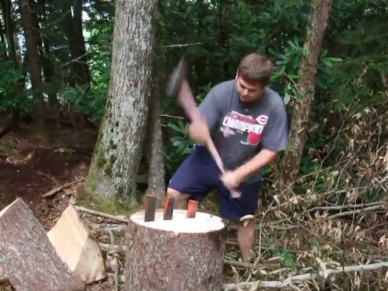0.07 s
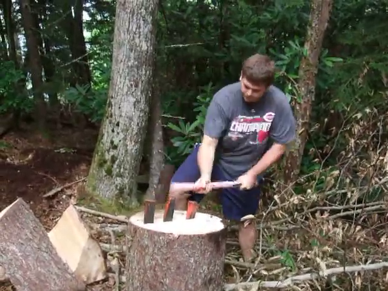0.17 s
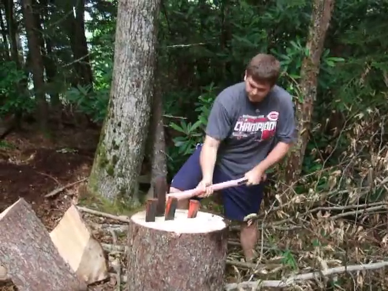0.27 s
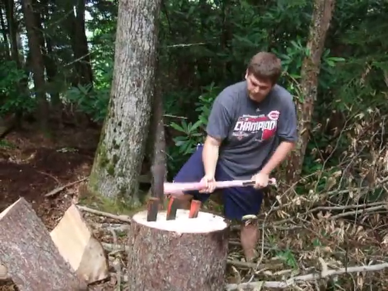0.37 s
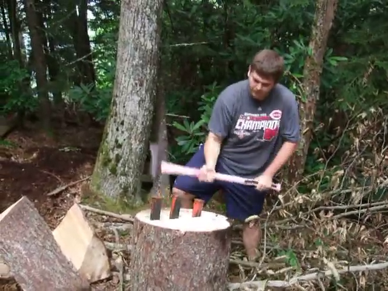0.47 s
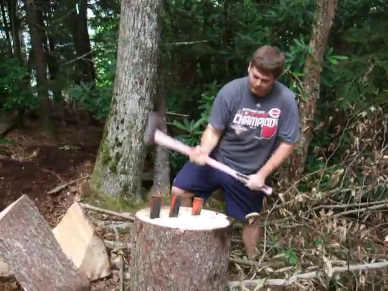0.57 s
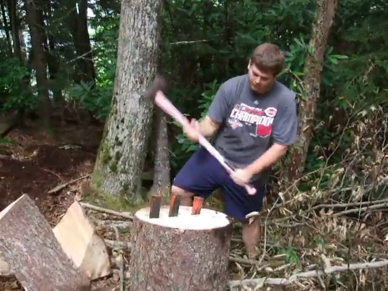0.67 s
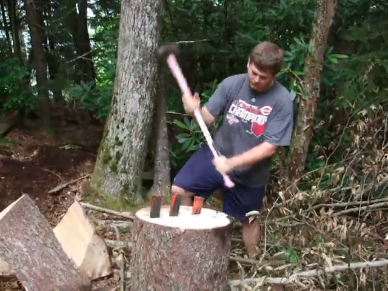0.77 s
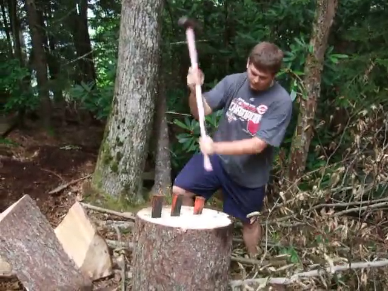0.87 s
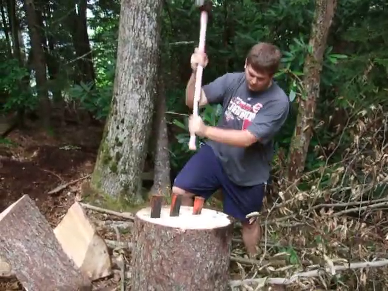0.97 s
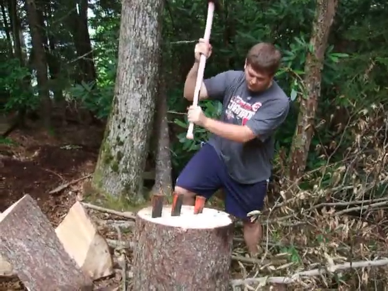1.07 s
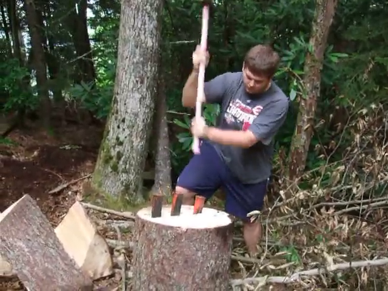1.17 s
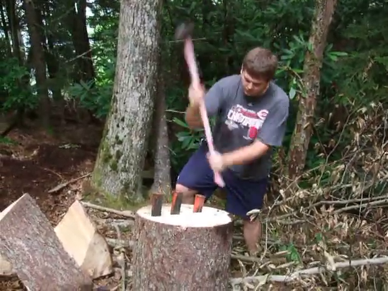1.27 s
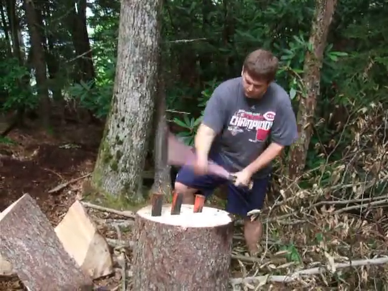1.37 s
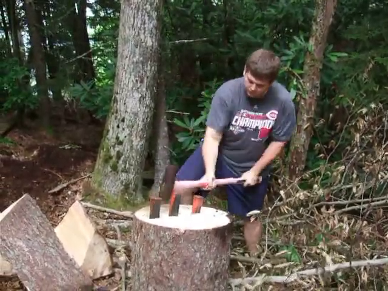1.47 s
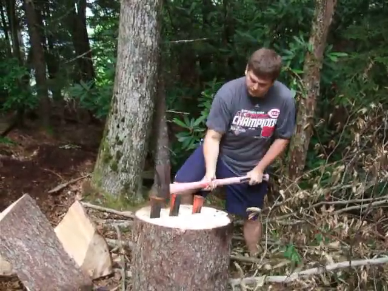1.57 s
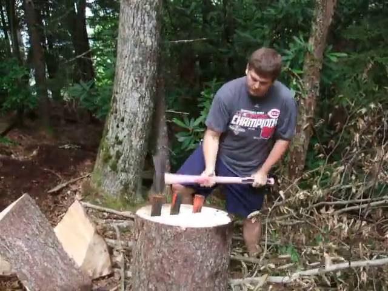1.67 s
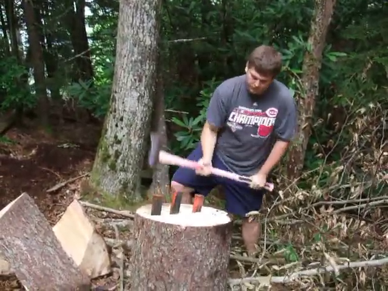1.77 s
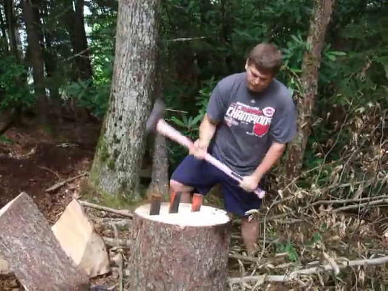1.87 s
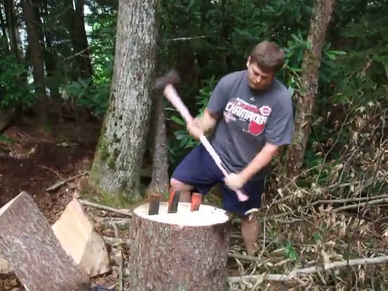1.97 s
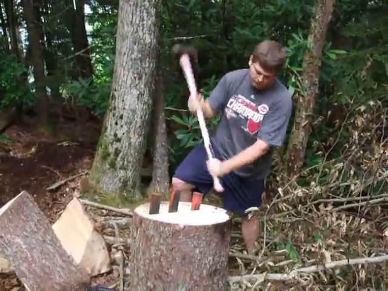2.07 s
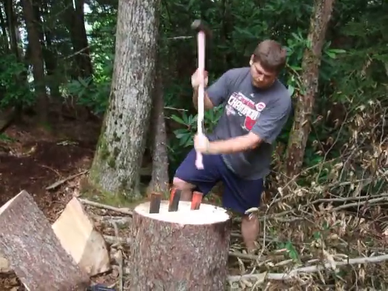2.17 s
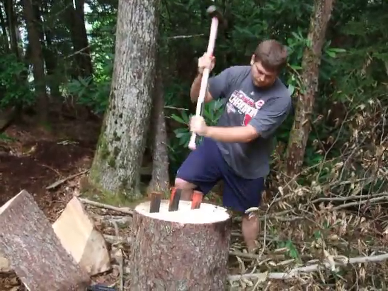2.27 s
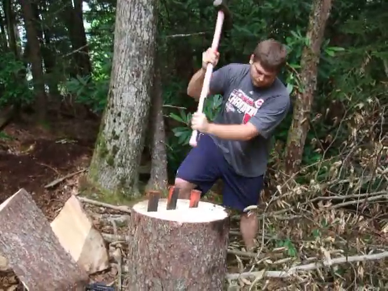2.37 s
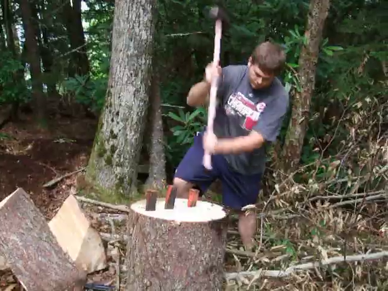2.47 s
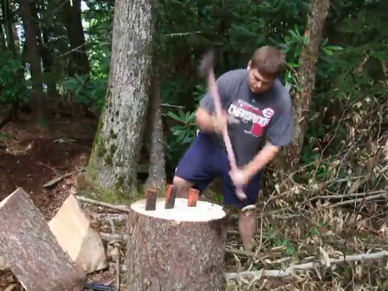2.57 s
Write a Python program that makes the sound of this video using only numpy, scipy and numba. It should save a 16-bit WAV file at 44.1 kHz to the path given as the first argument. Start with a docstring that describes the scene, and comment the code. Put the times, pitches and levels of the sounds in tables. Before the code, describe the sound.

Two hard metallic hammer strikes on splitting wedges outdoors, the first glancing off with a woody rattle

```python
"""Through a faint hiss comes the clink of a sledgehammer on a steel wedge in a log, at the edge of a wood.
The head glances off and clatters on the log; a second blow, on a lower-pitched wedge, bounces once.
Blows are sums of decaying modes with a noisy crack; knocks, thumps and twig ticks are resonant noise bursts.
The ground, the log and the trees scatter sound back as decaying random echoes. The recorder's limiter
ducks at each blow, so that the echo swells up as it lets go."""
import sys
import numpy as np
from scipy import signal
from scipy.fft import rfft, irfft
from scipy.io import wavfile
from numba import njit

SR = 44100
rng = np.random.default_rng(int(sys.argv[2]) if len(sys.argv) > 2 else 0)


def master_out(mix):
    """Clip the mix to full scale and print it as 16-bit PCM to the path in sys.argv[1]."""
    frames = np.transpose(np.atleast_2d(mix))
    ceiling = np.clip(frames, -1, 1)
    pcm = np.round(ceiling * 32767).astype(np.int16)
    wavfile.write(sys.argv[1], SR, pcm)


N = 114660  # length [samples]
TIME_S = np.arange(N) / SR


def undb(db):
    """Level: an amplitude ratio is ten to the power of its decibels over twenty."""
    return 10 ** (np.asarray(db) / 20)


def burst(x, db):
    """Energy scaling: set a short sound's level by its whole energy spread over 10 ms."""
    return x * undb(db) / np.sqrt(np.sum(x ** 2) / 441)


def fade(t60):
    """Exponential decay: the amplitude falls by 60 dB in t60 seconds."""
    return np.exp(-np.log(1000) * TIME_S / t60)


def at(s, x):
    """Pure delay: silence precedes a sound that starts at s seconds."""
    return np.concatenate([np.zeros(int(s * SR)), x])[:N]


def band(x, hz, q):
    """Resonance: a two-pole peak passes a band whose width is its frequency over q."""
    b, a = signal.iirpeak(hz, q, fs=SR)
    return signal.lfilter(b, a, x)


def low_cut(x, hz, order):
    """High-pass filtering: the response falls ever more steeply below the cutoff as the order rises."""
    return signal.sosfilt(signal.butter(order, hz, "high", fs=SR, output="sos"), x)


def narrow(x):
    """Band limiting: a linear-phase low-pass models the recorder's narrow sound channel."""
    lowpass = signal.firwin(241, 5910, window=("kaiser", 9), fs=SR)
    return signal.fftconvolve(x, lowpass, "same")


def crunch(t60):
    """Contact noise: a dying run of tiny pushes of random sign has a broad spectrum."""
    return np.sign(rng.standard_normal(N)) * fade(t60)


def ring(modes):
    """Modal superposition: a struck body sounds as damped sines that start together."""
    return sum(burst(np.sin(2 * np.pi * hz * TIME_S) * fade(t60), db) for hz, db, t60 in modes)


def air():
    """Shaped noise: a spectral envelope turns white noise into the faint, even hiss of the wood."""
    # spectral envelope of the hiss: (frequency [Hz], relative level [dB])
    envelope = [(15, -36.5), (25, -0.5), (170, -2.5), (267, -5.5), (392, -2.5), (550, -4.5), (616, -3),
                (1550, -6), (1700, -5.5), (4390, -3.5), (5500, -7.5), (7150, -58.5), (12100, -120)]
    hz, db = np.array(envelope).T
    bins_hz = np.maximum(np.fft.rfftfreq(N, 1 / SR), 1)
    gain = undb(np.interp(np.log(bins_hz), np.log(hz), db))
    hiss = narrow(irfft(rfft(rng.standard_normal(N)) * gain, N))
    return hiss / hiss.std() * undb(-50.5)


def scatter(x, db, t60, build_s, patchy_db):
    """Multiple scattering: convolution with uneven random echoes that build up and die away."""
    # one random strength for each run of 64 samples
    strength_db = patchy_db * np.repeat(rng.standard_normal(N // 64 + 1), 64)[:N]
    echoes = rng.standard_normal(N) * undb(strength_db)
    echoes *= fade(t60) * (1 - np.exp(-TIME_S / build_s))
    echoes *= undb(db) / np.sqrt(np.sum(echoes ** 2))
    return signal.fftconvolve(x, echoes)[:N]


def near_scatter(direct):
    """Early reflection: the log and the ground return short, patchy echoes."""
    return scatter(direct, db=-13, t60=0.075, build_s=0.00249, patchy_db=4.5)


def tree_scatter(sent):
    """Diffuse reverberation: trees return a slow-building tail, and those deeper in the wood a longer one."""
    build_s = 0.021
    edge = scatter(sent, db=-26, t60=0.62, build_s=build_s, patchy_db=3)
    deep = scatter(sent, db=-34.5, t60=1.04, build_s=build_s, patchy_db=1)
    return edge + deep


def twigs():
    """Resonant excitation: a brief snap of noise drives two broad resonances of a twig or chip."""
    # dry ticks: (time [s], level of the variable resonance [dB], its frequency [Hz])
    ticks = [(0.735, -45, 3460), (0.9016, -42, 3740), (0.9669, -46, 2700), (1.1965, -39.5, 3850),
             (1.8737, -51, 4530), (1.895, -44, 4100), (2.0916, -51.5, 4930), (2.1765, -49, 4600),
             (2.342, -50, 4900), (2.353, -57, 4530), (2.555, -42.5, 4440)]
    q = 0.95
    body_hz, body_db = 1020, -12.5  # body level is relative to the tick's own
    out = np.zeros(N)
    for s, db, hz in ticks:
        snap = narrow(crunch(t60=0.019))
        bright = burst(band(snap, hz, q), db)
        body = burst(band(snap, body_hz, q), db + body_db)
        out += at(s, bright + body)
    return out


def thumps():
    """Damped impact: two equal resonances in cascade leave a soft, low thump of the forest floor."""
    # dull thumps on the ground: (time [s], level [dB], frequency [Hz], noise t60 [s])
    impacts = [(.334, -34, 202, 0.026), (0.837, -54, 480, 0.11)]
    out = np.zeros(N)
    for s, db, hz, t60 in impacts:
        thump = band(band(crunch(t60), hz, 2.5), hz, 2.5)
        out += at(s, burst(thump, db))
    return out


def clatter():
    """Damped impact: each hammer-head knock excites a woody body, a bright snap and a hollow ring."""
    # hammer head on the log, levels ahead of the low cut: (time [s], body level [dB], body frequency [Hz],
    # snap level [dB], snap frequency [Hz], hollow ring level [dB], t60 of body and snap noise [s])
    knocks = [(0.4621, -28.5, 1510, -23, 4270, -46.5, 0.0068), (0.4899, -43, 1520, -34.5, 4460, -56, .008),
              (0.5293, -21, 693, -30, 3430, -26.5, 0.016), (.5305, -19, 1716, -36, 4200, -37, 0.017),
              (0.5713, -12.5, 1910, -18.5, 4480, -46, 0.0048), (.5720, -22, 900, -20, 4400, -52, .012),
              (0.6233, -41.5, 1000, -33.5, 5000, -48.5, 0.016),
              (0.6299, -31, 904, -35.5, 4600, -38.5, 0.02), (.6358, -19.5, 835, -21, 4400, -31, 0.02)]
    # modes of the log's top: (frequency [Hz], relative level [dB], t60 [s])
    hollow_modes = [(292, 2.5, 0.079), (360, -2.5, 0.035)]
    out = np.zeros(N)
    for s, body_db, body_hz, snap_db, snap_hz, hollow_db, t60 in knocks:
        body = burst(band(narrow(crunch(t60)), body_hz, q=3.36), body_db)
        snap = burst(band(narrow(crunch(t60)), snap_hz, q=4.2), snap_db)
        hollow = burst(ring(hollow_modes), hollow_db)
        out += at(s, body + snap + hollow)
    return low_cut(out, 267, order=4)


def blows(rows, wedge_modes):
    """Modal excitation: steel rings, cracks and thuds the log; returns direct sound and sound sent to the wood."""
    # modes of the log: (frequency [Hz], relative level [dB], t60 [s])
    log_modes = [(201, -0.5, 0.064), (291.4, -3.5, 0.071), (570, -11, 0.033)]
    crack_low_hz = 235
    crack_send_db, log_send_db = 5, 4  # extra spread of crack and log into the wood, against the ring
    rise = np.minimum(TIME_S / 0.0021, 1) ** 2  # swells for 2.1 ms while the head drives the wedge
    # a compact click stands for the crack in the sound sent to the trees
    click = low_cut(narrow(at(.002, signal.unit_impulse(N))), crack_low_hz, order=4)
    direct, sent = np.zeros(N), np.zeros(N)
    for s, ring_db, crack_db, log_db in rows:
        steel = burst(ring(wedge_modes) * rise, ring_db)
        thud = burst(low_cut(ring(log_modes) * rise, 111, order=4), log_db)
        crack = low_cut(narrow(crunch(t60=0.023) * rise), crack_low_hz, order=3)
        direct += at(s, steel + burst(crack, crack_db) + thud)

        sent_click = burst(click, crack_db + crack_send_db)
        sent_thud = undb(log_send_db) * low_cut(thud, crack_low_hz, order=4)
        sent += at(s, steel + sent_click + sent_thud)
    return np.array([direct, sent])


def hammer():
    """Modal contrast: each of two wedges is struck, and its own set of modes gives its pitch."""
    # modes of the two wedges: (frequency [Hz], relative level [dB], t60 [s])
    high_wedge = [(3166, -10, 0.01), (4536, 0.5, 0.007), (5113, 5, 0.022), (5194, 3, 0.023),
                  (5486, -2, 0.024), (5860, 3, 0.01)]
    low_wedge = [(1103, -5, 0.038), (2250, -7.5, .022), (2433, -7, 0.023), (2775, -3, 0.052),
                 (2962, 1, 0.033), (3114, 0.5, 0.016), (4120, 0.5, 0.0091), (4543, -26, 0.0054),
                 (5080, -6, 0.03), (5138, -3, 0.043)]
    # hammer on steel: (time [s], ring level [dB], crack level [dB], log level [dB])
    high_blows = [(.2018, 13.5, 4.5, -10.5)]
    low_blows = [(1.4498, 5.5, 5.5, -6), (1.4935, -35, -16.5, -26)]
    return blows(high_blows, high_wedge) + blows(low_blows, low_wedge)


def scene():
    """Superposition: direct sounds, their scattered echoes and the hiss add linearly."""
    small_sounds = twigs() + thumps() + clatter()
    direct, sent = hammer() + small_sounds  # the small sounds join both paths
    mix = direct + near_scatter(direct) + tree_scatter(sent) + air()
    return np.tile(mix, (2, 1))


@njit
def peak_follower(x, keep):
    """Envelope detection: jump to each peak, then sink exponentially."""
    out, e = np.empty(len(x)), 0.
    for i in range(len(x)):
        e = max(abs(x[i]), e * keep)
        out[i] = e
    return out


def record(dry):
    """Peak limiting: a mono, narrow-band recorder turns down at once above its limit and recovers slowly."""
    limit_db, release_s = -2.9, 0.037  # release is a time constant
    x = narrow(dry[0])
    envelope = peak_follower(x, np.exp(-1 / (release_s * SR)))
    limited = x / np.maximum(envelope / undb(limit_db), 1)
    top_cut = signal.ellip(8, .2, 70, 16700, fs=SR, output="sos")  # low-pass at 16.7 kHz
    return np.tile(signal.sosfilt(top_cut, limited), (2, 1))


dry = scene()
out = record(dry)
master_out(out)
```